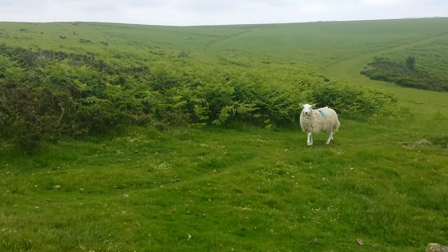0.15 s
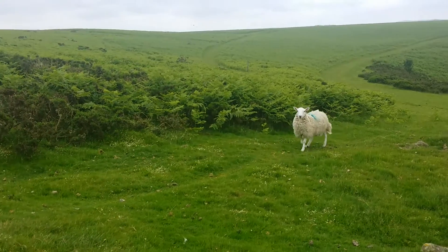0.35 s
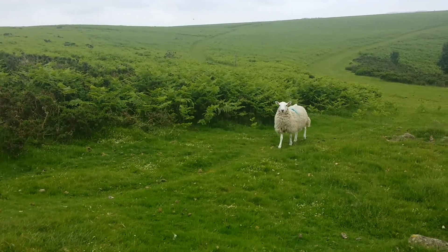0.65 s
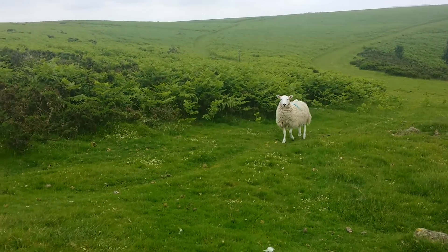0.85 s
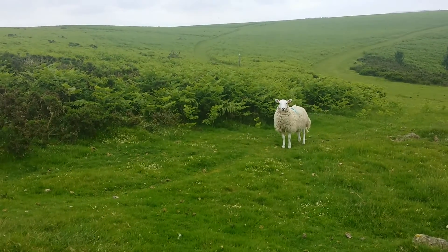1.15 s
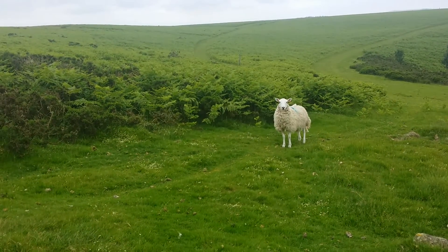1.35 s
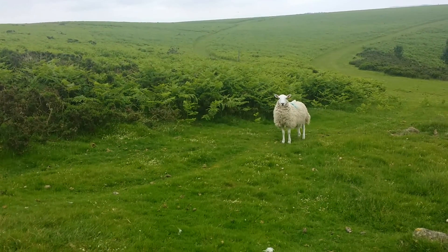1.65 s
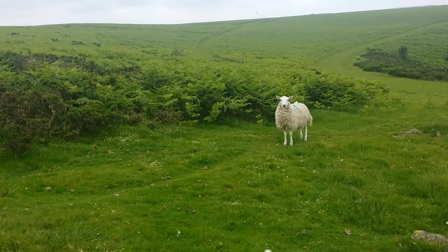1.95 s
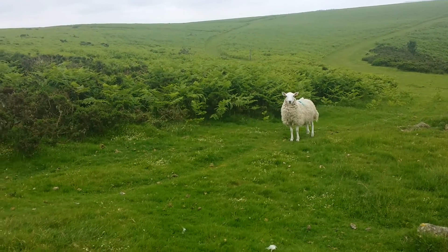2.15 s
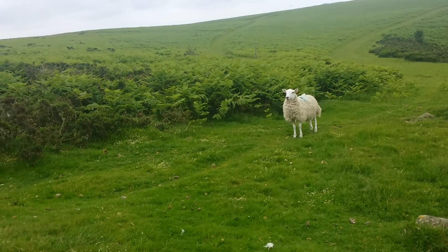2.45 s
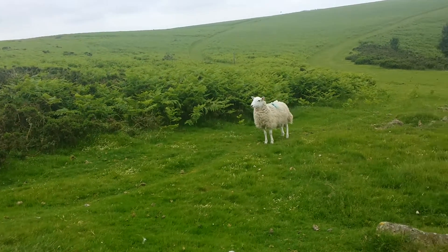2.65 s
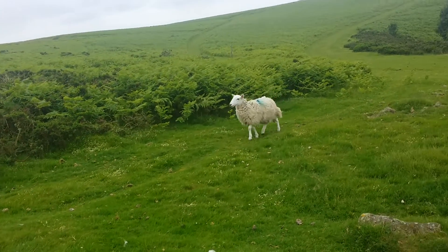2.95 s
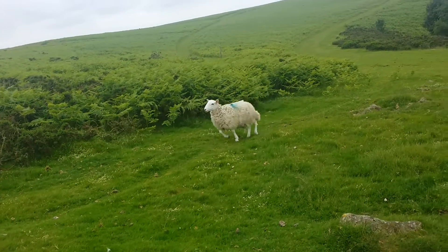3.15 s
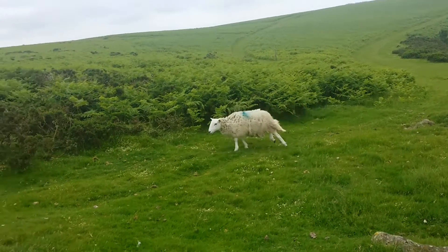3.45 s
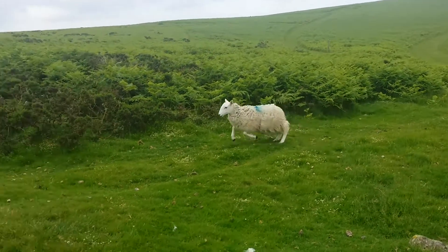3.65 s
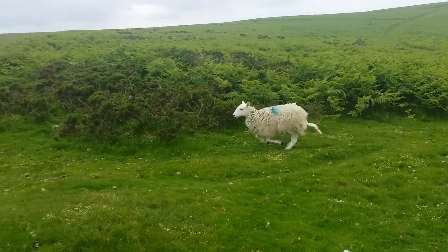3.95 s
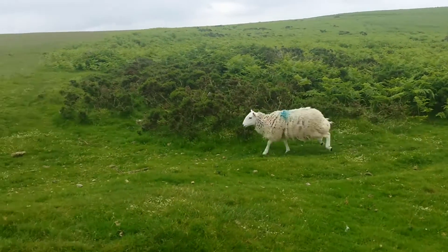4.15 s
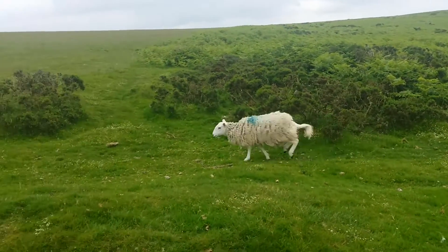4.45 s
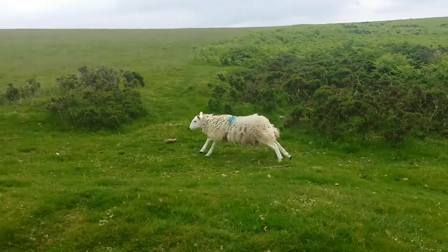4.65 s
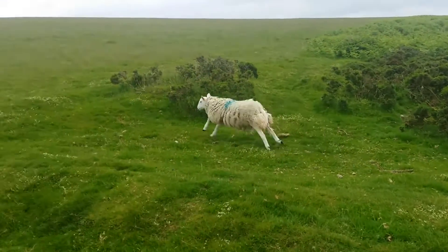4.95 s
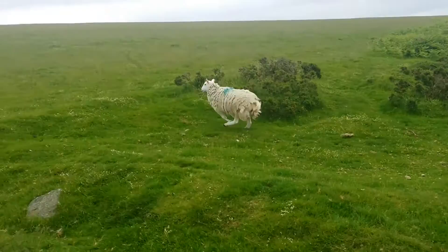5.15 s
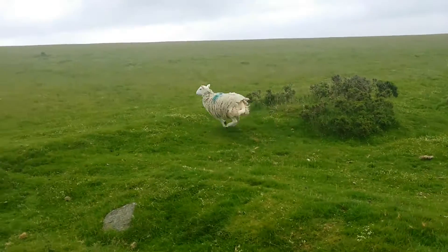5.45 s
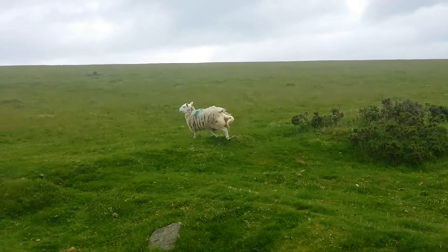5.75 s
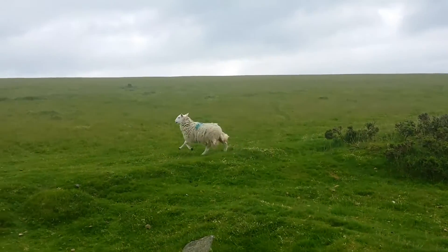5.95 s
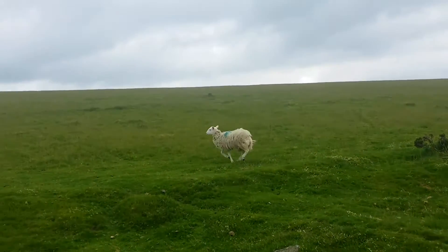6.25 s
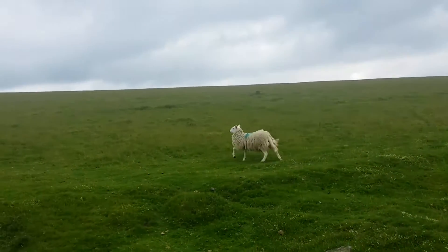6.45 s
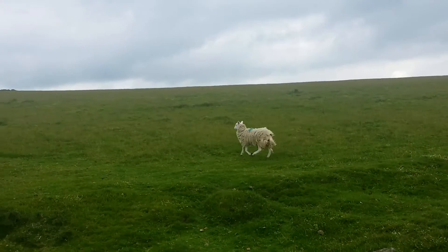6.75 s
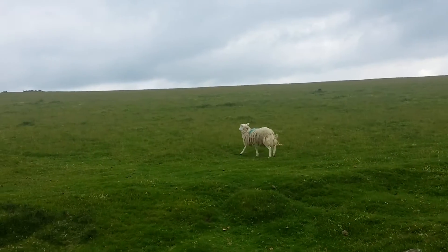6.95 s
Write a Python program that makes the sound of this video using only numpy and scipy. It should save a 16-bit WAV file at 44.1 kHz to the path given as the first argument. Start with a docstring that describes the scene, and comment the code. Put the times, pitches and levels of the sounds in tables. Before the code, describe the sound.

Quiet outdoor air with a faint low hum and distant bird twitter. After an early handling-like swish and snap, repeated soft trills give way to falling high whistles, then dense chirping. Wind buffets the two microphone ports unevenly, growing towards the end. A loud dry snap precedes a short throbbing sheep bleat, some distance away and without echo; bright lark notes follow over rumbling wind.

```python
"""Larks whistle and trill over open upland pasture, as gliding sines, with far ones twittering behind.
An early swish of wavering tone and hiss ends in a snap; more snaps, short decaying rings, come later.
Wind buffets the two microphone ports as low noise and grass rustles close by as brighter noise.
Late on a sheep bleats once, its vocal-fold pulses ringing a throbbing throat, with a noisy tail.
A faint hum of three sines and a bed of soft air noise lie underneath throughout."""
import sys
import numpy as np
from scipy import signal
from scipy.fft import rfft, irfft
from scipy.io import wavfile
from scipy.ndimage import uniform_filter1d

SR = 44100
rng = np.random.default_rng(int(sys.argv[2]) if len(sys.argv) > 2 else 0)


def wav_record(signal):
    """Record a signal, one row per channel, as 16-bit PCM in the file named by sys.argv[1]."""
    frames = np.transpose(np.atleast_2d(signal))
    bounded = np.clip(frames, -1, 1)
    # unit amplitude maps onto the largest positive 16-bit level
    quanta = np.round(bounded * 32767).astype(np.int16)
    wavfile.write(sys.argv[1], SR, quanta)


N = 312757

# stereo lean of a lark note by its mean pitch: pitch_hz, left_over_right_db
LARK_BALANCE = [(3000, 2), (3400, 0.5), (3800, 0.5), (4450, 7), (5100, 8), (6200, -5), (7800, -24)]


def amp(db):
    """Turn decibels into a gain."""
    return 10 ** (np.asarray(db) / 20)


def rms_gain(x):
    """Root-mean-square level."""
    return np.sqrt(np.mean(x ** 2))


def rms_one(x):
    """Scale to a root-mean-square level of one."""
    return x / np.sqrt(np.mean(x ** 2) + 1e-20)


def bandpass(x, low_hz, high_hz, order=2):
    """Keep only the band between two frequencies."""
    sos = signal.butter(order, [low_hz, high_hz], "band", fs=SR, output="sos")
    return signal.sosfilt(sos, x)


def in_time(rows):
    """Draw each column after the first (seconds) as a straight-line curve over the scene."""
    s, *columns = np.transpose(rows)
    return [np.interp(np.arange(N) / SR, s, column) for column in columns]


def at_hz(points, hz):
    """Read a curve over frequency, in straight lines on a log scale."""
    points = np.array(points)
    return np.interp(np.log(hz), np.log(points[:, 0]), points[:, 1])


def sides(pan_db):
    """Left and right gains whose mean is one; positive leans left."""
    gains = amp(np.multiply.outer([.5, -.5], pan_db))
    return gains / gains.mean(axis=0)


def drift(rate_hz):
    """Slow random wander with spread one, drawn every 40 samples."""
    r = np.exp(-80 * np.pi * rate_hz / SR)
    steps = rng.standard_normal(N // 40 + 2002)
    slow = signal.lfilter([1], [1, -2 * r, r * r], steps)[2000:]
    return np.interp(np.arange(N) / 40, np.arange(len(slow)), rms_one(slow))


def add(out, start_s, sound):
    """Mix a sound in at its start time."""
    i = round(start_s * SR)
    out[..., i:i + sound.shape[-1]] += sound[..., :N - i]


def banded_noise(spectrum, patchy_db, alike_share, tilted):
    """Half-octave bands of stereo noise that flicker jointly and singly; their mono sum has rms one."""
    # stereo lean of noise: frequency_hz, left_over_right_db
    air_balance = [(60, 1), (240, -1), (950, -4), (3770, 5.5), (15000, -6.5)]
    # how alike the two ports are: frequency_hz, likeness (0 to 1)
    likeness = [(300, 0.81), (1500, 0.21), (4000, .0)]
    out, together = 0, drift(15.8)
    edges = 25 * 2 ** np.arange(0, 9.6, .5)
    white = rng.standard_normal((2, 2, N))
    for k, (low, high) in enumerate(zip(edges, edges[1:])):
        hz = np.sqrt(low * high)
        if not spectrum[0][0] / 1.3 < hz < spectrum[-1][0] * 1.3:
            continue
        mid, side = bandpass(white[k % 2], low, high)     # neighbouring bands use separate noise
        alike = np.clip(alike_share * at_hz(likeness, hz), -1, 1)
        flicker_db = patchy_db * (.7 * together + .8 * drift(14.0))
        gain = amp(at_hz(spectrum, hz) + flicker_db)
        pair = np.sqrt(1 + alike) * mid + np.sqrt(1 - alike) * side * [[1], [-1]]
        out = out + gain * pair * sides(tilted * at_hz(air_balance, hz))[:, None]
    return out / rms_gain(out.mean(axis=0))


def sheep():
    """Each closing of the vocal folds rings the throat; throbs swell it, reshape it and lift the pitch."""
    # the bleat's pitch and steady effort under the throbs: time_s, pitch_hz, steady_effort_db
    bleat = [(5.41, 152.6, -64.5), (5.52, 158.1, -59.5), (5.55, 160.6, -44.5), (5.63, 173.8, -51),
             (5.8, 163.4, -48.5), (5.86, 171.6, -51.5), (5.98, 148, -51.5), (6.05, 163, -46.5),
             (6.125, 160, -50)]
    # throbs of the voice: middle_s, length_s, second_resonance_hz, lowest_resonance_db, upper_resonances_db
    throbs = [(5.449, 0.044, 1780, -53.5, -81), (5.506, 0.02, 1820, -46, -60),
              (5.566, .023, 1760, -36.5, -34), (5.637, .028, 1790, -32.5, -29),
              (5.713, .033, 1970, -38, -32), (5.786, .043, 1670, -42.5, -39),
              (5.865, .042, 1555, -41.5, -40.5), (5.945, .037, 1850, -43, -41),
              (6.017, .037, 1799, -41, -43.5), (6.086, 0.029, 1762, -40.5, -35.5)]
    # shape of the mouth: time_s, lowest_resonance_hz, third_resonance_hz
    mouth = [(5.448, 1026, 2294), (5.57, 734, 2300), (5.94, 796, 2532), (6.086, 760, 2610)]
    # widths of the three lower resonances, in Hz
    throat_width_hz = (65, 200, 230)
    # fixed upper resonances: frequency_hz, width_hz, relative level_db
    high_throat = [(3260, 170, -9), (4100, 420, -3), (5150, 480, 0), (7600, 700, -11), (9370, 500, -9)]
    # lag between the ports: frequency_hz, left_lead_rad
    sheep_phase = [(1000, 0), (1600, 1.0), (2400, .6), (4500, 2.0)]
    second_under_third_db = -1.5

    pitch, steady_db = in_time(bleat)
    t = np.arange(N) / SR
    throb_s, length_s, second_hz, low_db, upper_db = np.transpose(throbs)
    mouth_s, low_hz, third_hz = np.transpose(mouth)
    lift = sum(np.exp(-2.8 * ((t - mid) / span) ** 2) for mid, span in zip(throb_s, length_s))
    wobble = 1 + .035 * lift + .012 * drift(90.0)
    voiced = (t > bleat[0][0]) * (t < bleat[-1][0])
    cycles = np.cumsum(pitch * wobble * voiced) / SR
    closing_s = np.flatnonzero(np.diff(np.floor(cycles))) / SR

    # the upper resonances swell more briefly than the lowest
    swell = amp(-24 * ((closing_s[:, None] - throb_s) / length_s) ** 2)
    low = swell @ amp(low_db)
    second = swell ** 1.5 @ amp(upper_db + second_under_third_db)
    third = swell ** 1.5 @ amp(upper_db)
    steady = amp(steady_db[(closing_s * SR).astype(int)])
    levels = [low, second + amp(-5) * steady, third + steady]
    resonances_hz = [np.interp(closing_s, mouth_s, low_hz), np.interp(closing_s, throb_s, second_hz),
                     np.interp(closing_s, mouth_s, third_hz)]
    widths = list(throat_width_hz)
    for hz, width, db in high_throat:
        levels.append(amp(db) * (amp(-11.5) * third + amp(10) * steady))
        resonances_hz.append(np.full(len(closing_s), hz))
        widths.append(width)

    after = np.arange(1200) / SR
    pulses = 0
    for k, (level, hz, width) in enumerate(zip(levels, resonances_hz, widths)):
        uneven, detuned = rng.standard_normal((2, len(closing_s)))     # no two closings are alike
        ringing = np.sin(2 * np.pi * np.outer(hz * (1 + .018 * detuned), after))
        ringing = ringing * np.exp(-np.pi * width * after)
        if k > 2:     # turbulence shakes the upper resonances
            turbulence = uniform_filter1d(rng.standard_normal(ringing.shape), size=12, axis=1)
            ringing = ringing * (.8 + 1.6 * turbulence)
        pulses = pulses + (-1) ** k * (level * amp(1.5 * uneven))[:, None] * ringing
    # air rushing past the folds
    rasp = rng.standard_normal(pulses.shape) * np.exp(-after / .005) * (third + steady)[:, None]
    pulses = pulses + amp(-21) * bandpass(rasp, 3500, 10000)

    voice = np.zeros(N)
    for start_s, pulse in zip(closing_s, pulses):
        add(voice, start_s, pulse)
    voice = bandpass(voice, 520, 10200, order=4)
    lag = np.exp(-1j * at_hz(sheep_phase, np.fft.rfftfreq(N, 1 / SR) + 1))
    return np.array([voice, amp(3.0) * irfft(rfft(voice) * lag, N)])


def sung(hz, level, pan_db):
    """A near sine that reaches the two ports with a phase gap set by its pitch."""
    # lag between the ports: pitch_hz, left_lead_rad
    lark_phase = [(3700, 1.5), (4400, 1.0), (5000, -1.1), (5800, -2.3)]
    gap = np.exp(.5j * np.outer([1, -1], at_hz(lark_phase, hz)))
    pair = sides(pan_db)[:, None] * gap
    pair = pair / np.maximum(abs(pair.mean(axis=0)), .55)     # make up for what the gap cancels in mono
    turns = np.cumsum(hz) / SR + rng.random()
    return np.imag(pair * level * np.exp(2j * np.pi * turns))


def lark_whistles():
    """Single notes glide through one bend; the fainter ones flutter in level."""
    # notes by kind: start_s, end_s, start_hz, end_hz, level_to_bend_db, end_level_db
    whistles = { "hold": [(.125, .308, 3220, 3780, -64, -56.5), (1.664, 1.85, 3160, 3710, -71.5, -73.5),
                (3.254, 3.45, 3140, 3680, -68, -77), (4.425, 4.48, 6130, 6120, -54, -68),
                (5.365, 5.41, 3830, 3740, -64, -65), (6.102, 6.24, 4040, 4424, -38.5, -39.5),
                (6.291, 6.428, 4110, 4430, -39.5, -40), (6.683, 6.855, 4544, 4440, -48, -47.5)],
                "drop": [(1.372, 1.48, 5820, 4650, -79, -78), (3.55, 3.7, 8160, 7700, -64, -64),
                (5.708, 5.825, 5180, 3813, -52, -44), (5.915, 6.035, 5540, 3730, -46.5, -43)],
                "swoop": [(2.385, 2.43, 7900, 6360, -70.5, -72), (2.58, 2.645, 8060, 6260, -63.5, -83),
                (2.747, 2.845, 7770, 4900, -72, -49), (2.96, 3.047, 7700, 4670, -74, -49),
                (3.155, 3.245, 7700, 4780, -74, -55.5), (3.362, 3.442, 7500, 4740, -67.5, -47),
                (4.208, 4.252, 7230, 5440, -58.5, -45.5), (4.375, 4.433, 4650, 5680, -43.5, -54)],
                "glide": [(.095, .115, 4580, 5930, -66, -57), (1.248, 1.262, 6240, 5700, -67, -70),
                (1.256, 1.272, 5100, 5500, -67, -69), (1.29, 1.305, 5200, 5450, -71, -71),
                (2.88, 2.893, 4870, 6070, -57.5, -61), (3.477, 3.493, 5100, 5900, -57.5, -71),
                (3.785, 3.828, 3845, 4100, -54.5, -53), (3.873, 3.908, 3660, 4090, -60.5, -45),
                (3.957, 4.003, 3620, 4260, -62, -50), (4.001, 4.028, 4270, 4080, -58, -47),
                (4.04, 4.078, 3580, 4010, -62, -59), (4.118, 4.158, 3430, 3870, -68, -55),
                (4.112, 4.21, 5570, 4520, -61, -51), (4.291, 4.322, 6100, 4150, -46, -44.5),
                (4.534, 4.61, 4660, 4420, -45.5, -58), (4.566, 4.595, 3060, 2620, -55.5, -54),
                (4.69, 4.76, 5080, 4380, -58.5, -54), (5.3, 5.36, 3390, 5050, -57, -54.5),
                (7.011, 7.066, 4850, 3510, -43.5, -55)], "arch": [(2.147, 2.3, 5500, 5180, -62, -69),
                (4.037, 4.052, 4100, 4040, -49.5, -59), (4.629, 4.69, 4940, 4800, -57.5, -64),
                (4.845, 4.888, 4200, 4450, -60.5, -66), (5.143, 5.168, 4210, 3970, -63, -72),
                (5.268, 5.315, 7100, 7200, -68, -67)]}
    # bend by kind: share of the time, share of the glide done, overshoot as a share of pitch
    bends = {"hold": (.14, 0.97, 0.01186), "drop": (0.24, 0.96, -0.0075), "swoop": (0.5, 0.24, 0.0),
             "glide": (.47, .52, 0.0), "arch": (0.42, 0.426, 0.065)}
    end_droop_hz, end_droop_s = 160, 0.0067     # a held whistle sags as it ends
    out, flutter = np.zeros((2, N)), drift(47.0)
    for kind, rows in whistles.items():
        when, done, over = bends[kind]
        for start, end, hz0, hz2, db1, db2 in rows:
            t = np.arange(start, end, 1 / SR)
            bend = start + when * (end - start)
            hz1 = (hz0 + done * (hz2 - hz0)) * (1 + over)
            hz = np.interp(t, [start, bend, end], [hz0, hz1, hz2])
            hz = uniform_filter1d(hz, len(t) // 7, mode="nearest")     # round off the bend
            if kind == "hold":
                hz -= end_droop_hz * np.exp((t - end) / end_droop_s)
            ramp = np.minimum((t - start) / 0.0091, (end - t) / 0.0053)
            fade = np.sin(np.pi / 2 * np.clip(ramp, 0, 1))
            flutter_db = np.clip(-50 - db1, 0, 20) / 11 * flutter[round(start * SR):][:len(t)]
            level = fade * amp(flutter_db) * amp(np.interp(t, [bend, end], [db1, db2]))
            add(out, start, sung(hz, level, at_hz(LARK_BALANCE, hz.mean())))
    return out


def lark_trills():
    """Strings of short swept pips: one phrase sung five times, and other trills."""
    # single trills: first_s, last_s, pips_per_s, first_hz, last_hz, sweep_hz_per_ms, level_db
    trills = [(2.527, 2.5705, 58, 4870, 4730, 1, -58), (2.5883, 2.6383, 60, 4470, 4150, -48, -57.5),
              (2.6805, 2.749, 93, 5050, 3000, 20, -57), (2.993, 3.059, 69.4, 4740, 4650, -12, -53),
              (3.6296, 3.666, 101, 4700, 4450, 40, -50.5), (3.719, 3.745, 110, 3010, 2970, 8, -56),
              (3.792, 3.806, 102, 4160, 4200, -132, -51.5), (3.8355, 3.9175, 60.6, 4060, 3970, 72, -60.5),
              (3.837, 3.9193, 60.6, 3350, 3200, -120, -63), (4.267, 4.401, 93.5, 4170, 3970, 14, -48.5),
              (4.288, 4.392, 46.5, 3340, 3170, 69, -61), (4.461, 4.479, 105, 4510, 4450, 12, -49),
              (4.515, 4.559, 70, 4200, 4140, 55, -45.5), (4.634, 5.077, 32.3, 5350, 5470, -130, -60),
              (5.4153, 5.51, 61, 4280, 3340, -46, -52), (6.493, 6.525, 109, 5220, 5120, 78, -48),
              (6.541, 6.57, 104, 5030, 5190, -49, -49), (6.591, 6.6315, 49.5, 3480, 3410, -11, -47),
              (6.593, 6.637, 46.5, 4245, 4120, 92, -40.5), (6.6858, 6.8457, 71.2, 4490, 4320, 88, -41.5),
              (6.928, 6.951, 139, 4960, 5420, 53, -54), (6.989, 7.0083, 101, 5030, 5130, 21, -45.5)]
    # phrase of faint high run, rattle, soft lead-in and falling beads: first_s and last_s from the beads'
    # start, pips_per_s, first_hz, last_hz, sweep_hz_per_ms, relative level_db
    phrase = [(-.18, -0.124, 130, 5100, 4700, -11, -11), (-.108, -0.077, 60, 3930, 3770, -230, -5.5),
              (-.02, -0.007, 100, 4560, 4050, -64, -7.5), (0, 0.038, 100, 3660, 2950, 36, 0)]
    # its five singings: beads_start_s, level_db
    phrases = [(0.57, -57.5), (0.848, -56.5), (1.132, -57), (2.136, -61.5), (2.4228, -60)]
    out = np.zeros((2, N))
    phrased = [(s + first, s + last, *tune, db + part_db)
               for s, db in phrases for first, last, *tune, part_db in phrase]
    for first, last, per_s, hz0, hz1, sweep, db in phrased + trills:
        pips = max(round((last - first) * per_s), 1)
        half_ms = min(720 / per_s, 5.5)     # fast pips run into each other
        t_ms = np.arange(-half_ms, half_ms, 1000 / SR)
        level = amp(db) * np.cos(np.pi / 2 * t_ms / half_ms) ** 2
        pan_db = at_hz(LARK_BALANCE, (hz0 + hz1) / 2)
        for share in np.linspace(0, 1, pips + 1):
            steepness = 0.86 + 0.33 * share     # later pips sweep more steeply
            hz = np.maximum(hz0 + share * (hz1 - hz0) + sweep * steepness * t_ms, 1500)
            start_s = first + share * (last - first) - half_ms / 1000
            add(out, start_s, sung(hz, level, pan_db))
    return out


def larks():
    """Whistles and trills together, wavering slightly in level."""
    return (lark_whistles() + lark_trills()) * amp(.6 * drift(25.0))


def swish_and_snaps():
    """A wavering tone rises, then sinks under a bright hiss; short snaps ring a small hollow body."""
    # the swish: time_s, pitch_hz, level_db
    swish = [(0.198, 1071, -60.5), (0.23, 1208, -52), (0.249, 1264, -43.5), (.268, 1058, -46),
             (0.284, 418, -43), (0.306, 350, -65)]
    # the snaps: start_s, level_db, low_ring_db, crack_db
    snaps = [(.279, -36.5, -4.5, -5), (2.683, -68.5, 14, -12), (4.277, -64, -2, 9), (4.95, -32, -3, 1),
             (5.0167, -59, -6, 13.5), (6.085, -39.5, -11.5, 2.5)]
    # rings of the hollow body: frequency_hz, relative level_db, t60_s
    snap_modes = [(295, -1.5, 0.046), (610, 7, 0.024), (1770, 6.5, 0.0065), (2450, 2, 0.0061),
                  (7100, 14.5, 0.00067)]
    swish_hiss_db = -13
    # a dull scrape after the loudest snap
    scuff_s, scuff_spread_s, scuff_hz, scuff_db = 5.02, 0.038, (504, 760), -61

    hz, db = in_time([(.15, swish[0][1], -110)] + swish + [(.33, swish[-1][1], -110)])
    shaken_level = amp(db) * (1 + 0.3 * drift(87.0))
    shaken_hz = hz * (1 + 0.021 * drift(107.0))
    out = shaken_level * np.sin(2 * np.pi * np.cumsum(shaken_hz) / SR)
    out += amp(db + swish_hiss_db) * rms_one(bandpass(rng.standard_normal(N), 7000, 13000))

    scrape = rms_one(bandpass(rng.standard_normal(N), *scuff_hz))
    out += amp(scuff_db) * np.exp(-((np.arange(N) / SR - scuff_s) / scuff_spread_s) ** 2) * scrape

    t = np.arange(0, .06, 1 / SR)
    for start_s, level_db, low_db, crack_db in snaps:
        rings = 0
        for k, (hz, db, t60) in enumerate(snap_modes):
            ring_db = db + low_db * (hz < 1000) + crack_db * (hz > 4000) - 60 * t / t60
            rings = rings + (-1) ** k * amp(ring_db) * np.sin(2 * np.pi * hz * t)
        crack = signal.lfilter([.6], [1, -.5], rng.standard_normal(len(t)))
        crack = crack * amp(crack_db - 5 - 60 * t / .009)
        add(out, start_s, amp(level_db) * (rings + crack))
    return out * sides(-9.0)[:, None]


def wind():
    """Lumpy low noise of its own at each port, with single buffets as short low swings."""
    # wind on the ports: time_s, level_db, left_over_right_db
    wind_level = [(0, -70.5, 1), (.77, -77.5, -6), (.853, -54, 29), (.96, -59.5, -10.5), (1.33, -84, -2),
                  (2.33, -76, -7), (2.43, -63, -13), (2.55, -71.5, 9), (2.96, -74, -4), (3.9, -75.5, -1),
                  (4.29, -56.5, -7), (4.55, -63.5, -1), (4.84, -53, -11.5), (5.1, -56.5, -16),
                  (5.34, -62, -3), (5.62, -53.5, -5.5), (6.14, -54.5, 7.5), (6.455, -49, -0.5),
                  (6.57, -55.5, 13), (6.914, -44.5, 22), (7.09, -47.5, 28)]
    # its spectrum: frequency_hz, relative density_db_per_hz
    wind_colour = [(40, -8.5), (65, 5), (100, 7), (170, -2.5), (240, -16), (330, -36.5), (430, -52)]
    # added 190-370 Hz part: time_s, level_db
    wind_upper = [(0, -80), (3.93, -83), (4.0, -72.5), (4.3, -66), (4.6, -75.5), (4.8, -83), (5.1, -70),
                  (5.9, -75), (6.7, -80.5), (6.9, -65), (7.09, -77)]
    # buffets: time_s, level_db, swing_hz, left_over_right_db
    buffets = [(0.844, -32.5, 100.5, 32), (0.873, -52, 125, 20.5), (2.424, -40, 76, -28),
               (2.719, -48, 62.4, 12.0), (3.99, -46.5, 209, -1), (4.147, -47, 108.4, -12),
               (4.219, -47, 96.6, -25), (4.281, -36, 166, -2), (5.096, -40, 77.5, -27),
               (5.206, -38.5, 78.5, -18), (5.85, -32.5, 86, -19), (6.862, -32.5, 86.6, 31)]
    level_db, pan_db = in_time(wind_level)
    noise = banded_noise(wind_colour, patchy_db=2.5, alike_share=0, tilted=0)
    out = amp(level_db) * sides(pan_db) * noise
    upper = bandpass(rng.standard_normal((2, N)), 190, 370)
    out += amp(in_time(wind_upper)[0] + 4.5 * drift(20.0)) * rms_one(upper)
    for s, db, hz, side_db in buffets:
        t = np.arange(0, 3 / hz, 1 / SR)     # three swings
        swell = np.sin(np.pi * hz * t / 3) ** 2 * np.exp(-hz * t * 0.37)
        push = np.sin(2 * np.pi * hz * t) * swell
        add(out, s - 0.73 / hz, amp(db) * np.outer(sides(side_db), push))
    return out


def grass():
    """Grass rustle, a dull and a bright noise, steady and in bursts; the last is the bleat's noisy tail."""
    # steady rustle: time_s, low_part_db, high_part_db
    rustle = [(0, -70, -71), (.55, -83.5, -77.5), (1.1, -80.5, -74.5), (2.0, -81.5, -79), (2.5, -76, -74.5),
              (3.95, -78, -72.5), (4.3, -72, -64), (7.09, -70, -64.5)]
    # spectra of the two parts: frequency_hz, relative density_db_per_hz
    rustle_low = [(300, -1), (900, -2.5), (1400, -3.5), (2600, -6), (3600, -9)]
    rustle_high = [(4000, -3), (6800, 7), (8600, -13), (11000, -5.5), (14600, -6.5)]
    # separate bursts, the last one the bleat's noisy tail: peak_s, low_part_db, rise_and_fall_db_per_s
    burst_rows = [(0.263, -52.5, 188), (.409, -74.5, 120), (.678, -92, 300), (.948, -79.5, 81),
                  (2.21, -70.5, 89), (2.684, -71.5, 88), (2.817, -67, 156), (3.038, -72.5, 136),
                  (3.302, -72, 90), (3.612, -68, 187), (3.81, -65.5, 132), (5.009, -68.5, 111),
                  (6.151, -71, 89)]
    burst_high_db = -5.5     # bright part against the dull part
    low_db, high_db = in_time(rustle)
    t = np.arange(N) / SR
    bursts = sum(amp(db - steep * abs(t - s)) for s, db, steep in burst_rows)
    low = banded_noise(rustle_low, patchy_db=1.3, alike_share=1, tilted=1)
    high = banded_noise(rustle_high, patchy_db=2.3, alike_share=1, tilted=1)
    return (amp(low_db) + bursts) * low + (amp(high_db) + amp(burst_high_db) * bursts) * high


def far_twitter():
    """Many larks far off: short wavering notes in one pitch region, at random moments."""
    out = np.zeros((2, N))
    for when, pitch, glide, length, loud, side in rng.random((90, 6)):
        t = np.arange(0, 0.024 + 0.049 * length, 1 / SR)
        hz = 4600 + 1100 * pitch - 900 * (glide - .3) * t / t[-1]
        beads = 2 + 1.4 * np.sin(2 * np.pi * 85 * t)
        level = amp(-87 + 6 * loud) * beads * np.sin(np.pi * t / t[-1])
        add(out, when * N / SR, sung(hz, level, 16 * side - 4))
    return out


def hum():
    """A faint low tone with two overtones, wavering slightly in pitch and level."""
    # overall loudness: time_s, level_db
    hum_level = [(0, -72), (2.6, -74.5), (3.8, -73), (4.3, -80)]
    # the three tones: frequency_hz, relative level_db
    hum_lines = [(101, -5), (202, 1), (303, -6)]
    turns = np.cumsum(1 + 0.00358 * drift(2.12)) / SR
    lines = sum(amp(db + 2 * drift(13.0)) * np.sin(2 * np.pi * hz * turns) for hz, db in hum_lines)
    return amp(in_time(hum_level)[0]) * lines


def open_air():
    """A soft bed of noise, nearly steady, mostly low."""
    # its spectrum: frequency_hz, relative density_db_per_hz
    air_colour = [(35, -49), (60, 12), (150, -15), (203, 2), (255, -5.5), (307, -13.5), (423, -16),
                  (2990, -39), (5070, -8.5), (9220, -39.5), (14600, -32)]
    return amp(-75) * banded_noise(air_colour, patchy_db=.3, alike_share=.3, tilted=1)


def noise_blur(x):
    """Voices get a faint, short noise blur, drawn separately for each port."""
    blur_db, blur_t60_s, blur_delay_s = -21, .05, .003
    t = np.arange(0, .2, 1 / SR)
    blur = rng.standard_normal((2, len(t))) * amp(-60 * t / blur_t60_s) * (t > blur_delay_s)
    blur = amp(blur_db) * blur / np.sqrt((blur ** 2).sum(axis=1, keepdims=True))
    return x + signal.fftconvolve(x, blur, axes=1)[:, :N]


def scene():
    """The animal voices are slightly blurred; all other layers are added plain."""
    voices = noise_blur(sheep() + larks() + far_twitter())
    return voices + swish_and_snaps() + wind() + grass() + hum() + open_air()


def record(dry):
    """The microphone drops the deep bass, the top is cut steeply."""
    thin = signal.sosfilt(signal.butter(5, 46, "high", fs=SR, output="sos"), dry)
    # order 16, 50 dB down from 15 kHz
    return signal.sosfilt(signal.cheby2(16, 50, 15000, fs=SR, output="sos"), thin)


dry = scene()
out = record(dry)
wav_record(out)
```